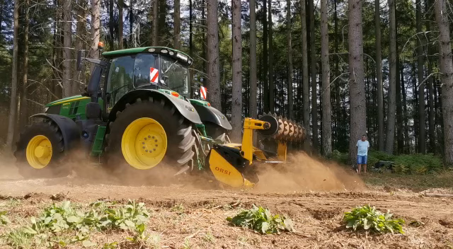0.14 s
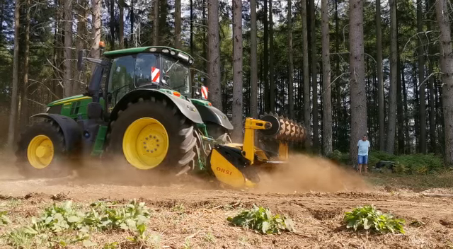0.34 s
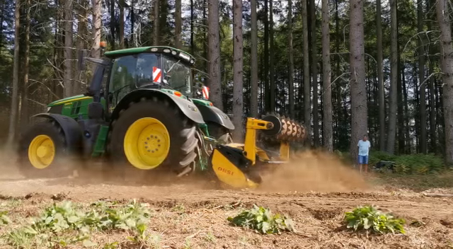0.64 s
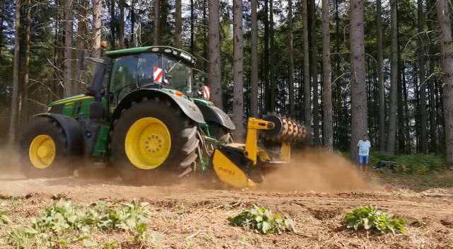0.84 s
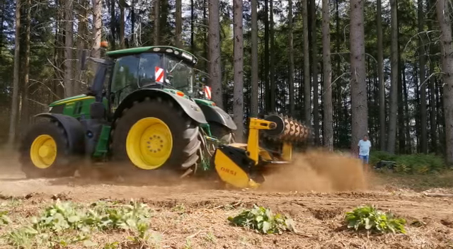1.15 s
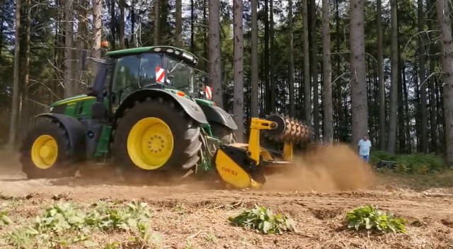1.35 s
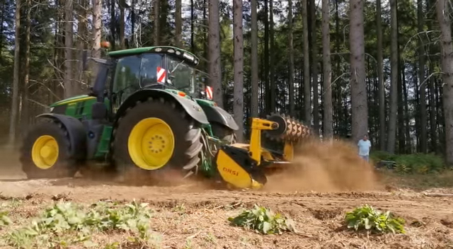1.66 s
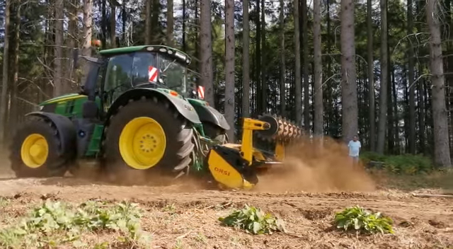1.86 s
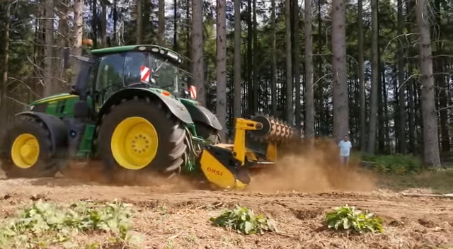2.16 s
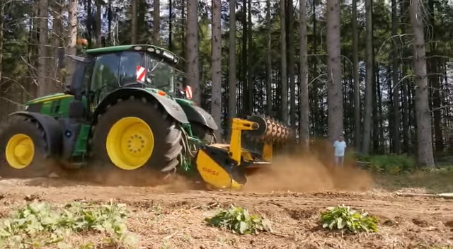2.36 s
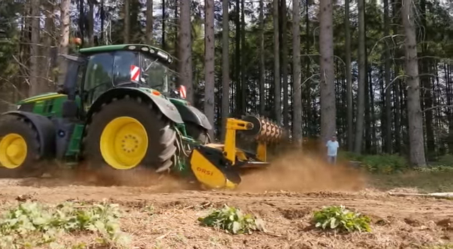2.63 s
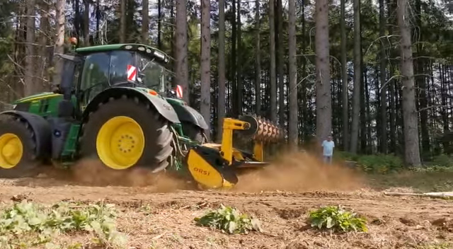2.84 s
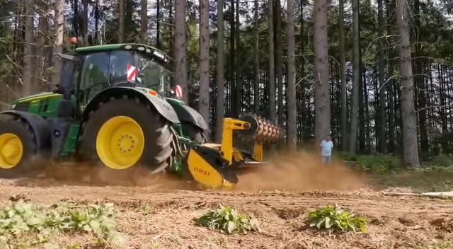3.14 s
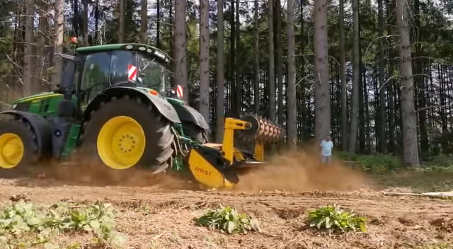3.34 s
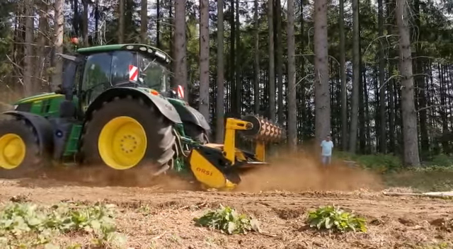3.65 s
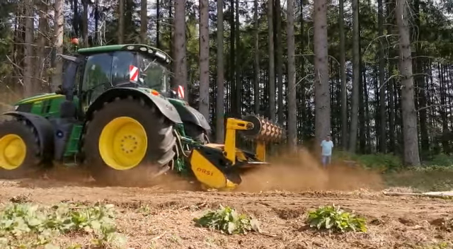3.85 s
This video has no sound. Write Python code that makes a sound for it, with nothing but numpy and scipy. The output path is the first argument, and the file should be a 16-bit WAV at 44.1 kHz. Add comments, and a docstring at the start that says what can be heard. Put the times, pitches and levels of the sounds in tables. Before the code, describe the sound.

Silence until about 0.37 s, then a tractor-driven mulcher cuts in abruptly and runs to 4 s. A wavering low thrum near 106 Hz, stronger left, sits over rumble, beneath dense gritty hiss. Chips crack on the hood, clustered at 0.4-1.2, 3.2-3.4 and loudest near 3.65 s. Thin fuzzy gear whine around 1.55 kHz persists. Grinding brightens near 0.7 s; the machine creeps left until 3 s, then slightly back.

```python
"""Mulcher at the forest edge

A tractor drags a mulcher over soil and wood scraps at the edge of a forest, heard at two small microphone ports.
The toothed rotor thrums in wavering harmonics over a noise rumble; pulsing noise makes the earth hiss.
Short filtered bursts are grit and chips cracking on the hood; fuzzy tones are gears.
After a short silence the sound cuts in; the machine creeps to the left, then edges back a little.
"""
import sys
import numpy as np
from scipy import signal
from scipy.fft import rfft, irfft
from scipy.io import wavfile
from scipy.ndimage import uniform_filter1d

SR = 44100
rng = np.random.default_rng(int(sys.argv[2]) if len(sys.argv) > 2 else 0)


def materialize(psi):
    """Save the field psi as 16-bit PCM at rate SR to the path in sys.argv[1].

    A 1-D psi becomes a single channel; in a 2-D psi each row is a channel.
    """
    bounded = np.clip(np.atleast_2d(psi).T, -1, 1)
    quanta = np.round(bounded * 32767).astype(np.int16)
    wavfile.write(sys.argv[1], SR, quanta)


N = 176400  # 4 s
TIME_S = np.arange(N) / SR


def gain_of(db):
    """Decibels to gain."""
    return 10 ** (np.asarray(db) / 20)


def evened(x):
    """Scales a signal to rms 1."""
    return x / np.sqrt(np.mean(abs(x) ** 2) + 1e-20)


def read(points, hz):
    """Reads a spectrum table on a log-frequency axis."""
    f, value = np.transpose(points)
    return np.interp(np.log(hz + 1), np.log(f + 1), value)


def curve(table, index, at=TIME_S):
    """Reads one column of a table along its first column."""
    rows = np.array(table)
    return np.interp(at, rows[:, 0], rows[:, index])


def drift(rate_hz):
    """Slow complex random signal of rms 1: noise through two equal low-pass poles."""
    steps = np.arange(0, N + 200, 100)
    pole = np.exp(-2 * np.pi * rate_hz * 100 / SR)
    noise = rng.standard_normal((2, len(steps)))
    a, b = signal.lfilter([1], [1, -2 * pole, pole * pole], noise)
    samples = np.arange(N)
    return evened(np.interp(samples, steps, a) + 1j * np.interp(samples, steps, b))


def coloured(points):
    """Noise of rms 1 with the given spectrum."""
    spectrum = rfft(rng.standard_normal(N))
    return evened(irfft(spectrum * gain_of(read(points, np.fft.rfftfreq(N, 1 / SR))), N))


ROTOR_HZ = 26.575
ROTOR_TURN = 2 * np.pi * ROTOR_HZ * TIME_S  # radians
WAVER_HZ, WAVER, MAIN_WAVER = 3.5, .5, .16  # the strongest harmonic wavers least
RUMBLE_DB = -8  # against the harmonics
THRUM_RIGHT_DB, THRUM_APART_DB = -9, -13  # right port; the rumble heard there alone
# Rotor harmonics. Columns: multiple_of_rotor_speed, relative_level_db
ROTOR_HARMONICS = [(2, -8), (3, -14), (4, 3.5), (5, -8.5), (6, -6.5), (7, -19), (8, -9), (10, -18.5),
                   (11, -23.5), (12, -25), (13, -26), (14, -28), (15, -28.5), (17, -26), (18, -33.5)]
# Low rumble of soil and engine. Columns: frequency_hz, relative_level_db
RUMBLE_SPECTRUM = [(20, -30), (40, -3), (80, -1), (130, -1), (190, -3.5), (260, -7.5), (340, -23),
                   (600, -35)]
# Level over time, dipping after loud clicks as if a gain control ducks; grinding and gears follow it too.
# Columns: time_s, thrum_level_db, relative_grinding_level_db
LEVEL_CURVE = [(0.38, -31, -31.5), (0.46, -30, -32.5), (0.83, -37, -39.5), (0.9, -34, -36),
               (1.08, -35.5, -37.5), (1.15, -34.5, -33.5), (1.22, -34, -35), (1.42, -33.5, -34),
               (1.44, -34, -39.5), (1.46, -37.5, -35), (1.73, -32, -34), (2.05, -35, -35),
               (2.17, -32, -32.5), (2.25, -37, -36.5), (2.4, -29.5, -34), (2.42, -35, -34.5),
               (2.61, -29.5, -33.5), (2.78, -33, -31.5), (2.85, -31.5, -34.5), (3.15, -29.5, -32),
               (3.32, -36, -36), (3.63, -31, -32.5), (3.67, -33, -34.5), (4.0, -32.5, -32.5)]


def thrum():
    """Rotor harmonics, each wavering as the teeth bite unevenly, over a low rumble."""
    tone = np.zeros(N)
    for multiple, db in ROTOR_HARMONICS:
        depth = WAVER if db < 0 else MAIN_WAVER
        waver = evened(0.5 + depth * drift(WAVER_HZ))
        tone += gain_of(db) * (np.exp(1j * multiple * ROTOR_TURN) * waver).real
    left = evened(evened(tone) + gain_of(RUMBLE_DB) * coloured(RUMBLE_SPECTRUM))
    right = gain_of(THRUM_RIGHT_DB) * (left + gain_of(THRUM_APART_DB) * coloured(RUMBLE_SPECTRUM))
    pair = np.array([left, right])
    middle_rms = np.sqrt(np.mean(pair.mean(0) ** 2))
    return pair / middle_rms * gain_of(curve(LEVEL_CURVE, index=1))


SCATTER_S = 0.00034  # scattered arrivals decay this much more slowly


def burst(hz, q, decay_s, tick):
    """A tick and a short dying rattle round one pitch: one direct and two scattered paths."""
    t = np.arange(0, .05, 1 / SR)
    b, a = signal.iirpeak(hz, q, SR)
    decays = decay_s + 1e-4 + np.array([[0], [1], [1]]) * SCATTER_S
    rattle = rng.standard_normal((3, len(t)))
    tick_at = rng.integers(0, 12, 3) * [0, 1, 1]  # samples; the direct tick is first
    rattle[range(3), tick_at] = tick
    puff = signal.lfilter(b, a, signal.lfilter(b, a, rattle * np.exp(-t / decays)))
    puff = puff / np.linalg.norm(puff, axis=1, keepdims=True)
    return puff / abs(puff[0]).max()


TEETH_DEPTH, TURN_DEPTH = .07, .065  # pulsing four times and once a turn
PATCH_DB, FLICKER_DB, FLICKER_HZ = 1.6, 1.2, 47.0


def hiss():
    """Hiss of torn earth: patchy, flickering noise that pulses with the rows of teeth."""
    _, _, z = signal.stft(rng.standard_normal((3, N)), SR, nperseg=256)
    over_time = uniform_filter1d(rng.standard_normal(z[0].T.shape), size=8, axis=0)
    patches = evened(uniform_filter1d(over_time, size=12, axis=1)).T
    earth = evened(signal.istft(z * gain_of(PATCH_DB * patches), SR, nperseg=256)[1][:, :N])
    pulse = 1 + TEETH_DEPTH * np.cos(4 * ROTOR_TURN) + TURN_DEPTH * np.cos(ROTOR_TURN)
    return earth * pulse * gain_of(FLICKER_DB * np.sqrt(2) * drift(FLICKER_HZ).real)


GRIT_PER_S = 1500  # before clumping
GRIT_CLUMP_DB, GRIT_CLUMP_HZ, GRIT_SPREAD_DB = 2.5, 29.8, 2.5
GRIT_Q, GRIT_S, GRIT_TICK = .8, 0.001, 4


def grit():
    """A hail of small grains in clumps, each a burst at one of sixteen pitches."""
    clumps = gain_of(GRIT_CLUMP_DB * np.sqrt(2) * drift(GRIT_CLUMP_HZ).real)
    size = gain_of(GRIT_SPREAD_DB * np.minimum(rng.exponential(1, N), 4))
    size = size * (rng.random(N) < GRIT_PER_S / SR * clumps)
    kind = rng.integers(0, 16, N)
    hail = np.zeros((3, N))
    for k, hz in enumerate(np.geomspace(1800, 15000, 16)):
        grain = hz ** 0.8 * burst(hz, GRIT_Q, GRIT_S, GRIT_TICK)
        hits = (size * (kind == k))[None]
        hail += signal.oaconvolve(hits, grain, axes=1)[:, :N]
    return hail


GRIT_DB, GRIND_DB = -4, 5  # grit against hiss; lift of both


def grinding():
    """Hiss and grit together follow the level curve; three paths."""
    both = evened(evened(hiss()) + gain_of(GRIT_DB) * evened(grit()))
    return both * gain_of(curve(LEVEL_CURVE, index=2) + GRIND_DB)


CHIP_Q, CHIP_DB, CHIP_TICK, RATTLE_CYCLES = .95, 2.5, 5, 14
# Loudest chips on the hood. Columns: start_s, relative_peak_db, centre_hz
HOOD_CHIPS = [(0.3945, -16.5, 4600), (.4152, -23.5, 5100), (.4466, -13, 7600), (.4496, -16, 6700),
              (.5613, -20, 8500), (0.5922, -24, 4100), (.6748, -12.5, 8900), (0.677, -15.5, 8900),
              (.7641, -16.5, 7400), (0.808, -18, 7000), (0.831, -21, 7600), (0.9468, -23, 5300),
              (1.011, -20, 7350), (1.095, -17, 10000), (1.151, -17.5, 3170), (1.2037, -23, 4000),
              (1.2394, -22, 2970), (1.4194, -21, 5800), (1.8016, -23, 9300), (1.9716, -18.5, 6100),
              (2.0339, -19, 4500), (2.2151, -15, 7700), (2.4614, -26, 4800), (3.1618, -21.5, 4100),
              (3.263, -15.5, 6700), (3.2802, -17, 6900), (3.307, -19, 6440), (3.3532, -21, 5200),
              (3.3575, -15, 6340), (3.4254, -23, 6900), (3.622, -20, 4750), (3.652, -11.5, 9500),
              (3.6588, -11, 9240), (3.815, -17, 4800), (3.9375, -15, 4200)]


def chips():
    """Single larger scraps crack against the hood; the rattle decays over a number of cycles."""
    out = np.zeros((3, N + SR))
    for start_s, db, hz in HOOD_CHIPS:
        puff = gain_of(db + CHIP_DB) * burst(hz, CHIP_Q, RATTLE_CYCLES / hz, CHIP_TICK)
        first = round(start_s * SR)
        out[:, first:first + puff.shape[1]] += puff
    return out[:, :N]


SIDES = np.array([[1], [-1]]) / 2  # left, right share of a level difference
WHINE_WIDTH_HZ, WHINE_FUZZ = 8.0, .5
# Gear whines. Columns: pitch_hz, level_db, left_minus_right_db
GEAR_WHINES = [(516.6, -59.5, 2.5), (628.3, -56, 4), (1390, -63, 1), (2338, -62, 6)]


def whines():
    """Thin tones of meshing gears, made fuzzy by random drift."""
    tones = np.zeros((2, N))
    for hz, db, pan_db in GEAR_WHINES:
        fuzz = evened(1 + WHINE_FUZZ * drift(WHINE_WIDTH_HZ))
        tone = (np.exp(2j * np.pi * hz * TIME_S) * fuzz).real
        tones += gain_of(db + pan_db * SIDES) * np.sqrt(2) * tone
    return tones


GROWL_HZ, GROWL_WIDTH_HZ, GROWL_DB = 1002, 74, -49.5


def growl():
    """A rough band from the drive line: a tone carried by fast random drift, equal at both ports."""
    return gain_of(GROWL_DB) * (np.exp(2j * np.pi * GROWL_HZ * TIME_S) * drift(GROWL_WIDTH_HZ)).real


WHISTLE_PAN_DB, WHISTLE_FUZZ = 11, .4  # left minus right
# Clearest gear whine. Columns: time_s, pitch_hz, level_db
WHISTLE_PATH = [(.4, 1549, -53), (.9, 1546, -56), (1.8, 1549, -51), (2.15, 1545, -57), (2.5, 1549, -50),
                (3.1, 1551, -48), (3.3, 1553, -53), (4, 1552, -52)]


def whistle():
    """The clearest gear whine, gliding slightly in pitch and level."""
    phase = 2 * np.pi * np.cumsum(curve(WHISTLE_PATH, index=1)) / SR
    tone = np.exp(1j * phase) * evened(1 + WHISTLE_FUZZ * drift(WHINE_WIDTH_HZ))
    return gain_of(curve(WHISTLE_PATH, index=2) + WHISTLE_PAN_DB * SIDES) * np.sqrt(2) * tone.real


def gears():
    """Whines and growl follow the level curve weakly; the whistle keeps its own level."""
    level = evened(gain_of(0.18 * curve(LEVEL_CURVE, index=2)))
    return (whines() + growl()) * level + whistle()


LAG_S = 25e-6  # lag of the left port at bearing 1
TREBLE_HZ = 9500  # middle of the brightness slope
# Colour at the left port. Columns: frequency_hz, relative_level_db
LEFT_COLOUR = [(350, -3.5), (600, 0.5), (780, -1.5), (1000, 5), (1250, -2.5), (1600, 1.35), (2500, 2),
               (3500, 0.1), (4700, 1), (6000, -5), (6800, -2.5), (8300, -11.5), (10000, -7), (13500, -4.5),
               (15500, -10)]
# Colour at the right port. Columns: frequency_hz, relative_level_db
RIGHT_COLOUR = [(350, -5), (600, -3), (780, -5.5), (1050, -5), (1400, -4.5), (2000, -4.5), (2700, -6),
                (3100, -1), (4700, -0.5), (6050, -3), (6400, 4), (6800, 4.5), (7600, 0), (8200, 2),
                (8750, -2), (10000, -1.5), (10800, -1), (11500, -12), (13000, -10), (14200, -19),
                (15500, -23)]
# Likeness of the ports. Columns: frequency_hz, shared_power_0_to_1
LIKENESS = [(300, .98), (800, .85), (1600, .62), (2200, .68), (2600, .25), (3000, .55), (4400, .74),
            (7000, .7), (11500, .35), (15000, .3)]
# Phase by which the left port leads at bearing 0. Columns: frequency_hz, lead_radians
LEFT_LEAD = [(300, 0), (1300, 1.3), (1700, -.3), (2400, .8), (2750, -2.2), (3500, -.3), (5200, .6),
             (6600, 3.1), (8800, 6.1), (11500, 6.6), (12300, 9.6), (15500, 22)]
# Bearing of the machine, smaller further left. Columns: time_s, bearing
MACHINE_BEARING = [(.4, 1.76), (1.2, 1.33), (2.0, 0.81), (3.0, 0), (4.0, 0.41)]
# Change of colour at bearing 1. Columns: frequency_hz, left_db, right_db
BEARING_SHADE = [(300, 0.4, 1.2), (2500, -0.5, -0.1), (4500, -1.5, -0.5), (6000, -5, 1.5), (6460, -5, 0.5),
                 (8900, -3, 1), (10300, -2.5, -1), (12500, -5, -2), (15000, -4.5, 2.5)]
# Brightness of grinding and chips. Columns: time_s, extra_treble_db
BRIGHTNESS = [(.4, -0.5), (.7, 6.5), (.9, 1), (1.1, 1), (1.4, -3.5), (1.8, 2), (2.6, 0.5), (3.0, -3.5),
              (3.3, -0.5), (3.65, 0), (4.0, -3.5)]


def ports(x):
    """Each port colours the sound; part arrives scattered by the trunks, and shade and lag follow the bearing."""
    hz, t, z = signal.stft(x, SR, nperseg=512, noverlap=384)
    f = hz[:, None]
    treble_share = 1 / (1 + (TREBLE_HZ / (f + 1)) ** 4)
    z = z * gain_of(curve(BRIGHTNESS, index=1, at=t) * treble_share)
    # the direct path is common, one scattered path goes to each port
    same = np.clip(read(LIKENESS, hz), 0, 1)[:, None]
    left, right = np.sqrt(same) * z[0] + np.sqrt(1 - same) * z[1:]
    bearing = curve(MACHINE_BEARING, index=1, at=t)
    left_shade_db = curve(BEARING_SHADE, index=1, at=hz)[:, None] * bearing
    right_shade_db = curve(BEARING_SHADE, index=2, at=hz)[:, None] * bearing
    lead = curve(LEFT_LEAD, index=1, at=hz)[:, None] - 2 * np.pi * f * LAG_S * bearing
    bass_cut_db = -40 / (1 + (hz / 150) ** 4)
    left_db = (read(LEFT_COLOUR, hz) + bass_cut_db)[:, None] + left_shade_db
    right_db = (read(RIGHT_COLOUR, hz) + bass_cut_db)[:, None] + right_shade_db
    pair = np.array([left * gain_of(left_db) * np.exp(1j * lead), right * gain_of(right_db)])
    return signal.istft(pair, SR, nperseg=512, noverlap=384)[1][:, :N]


def scene():
    """Thrum and gears come as a stereo pair; grinding and chips pass through the ports."""
    return thrum() + ports(grinding() + chips()) + gears()


START_S, EDGE_HZ = .3675, 15780


def record(dry):
    """The sound cuts in abruptly after silence; a steep low-pass removes the top."""
    opened = dry * np.clip((TIME_S - START_S) / 0.00014, 0, 1)
    low_pass = signal.firwin(511, EDGE_HZ, window=("kaiser", 9), fs=SR)
    return signal.oaconvolve(opened, low_pass[None], "same")


dry = scene()
out = record(dry)
materialize(out)
```